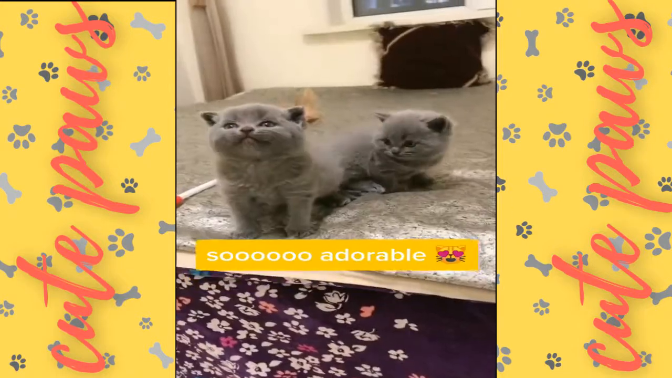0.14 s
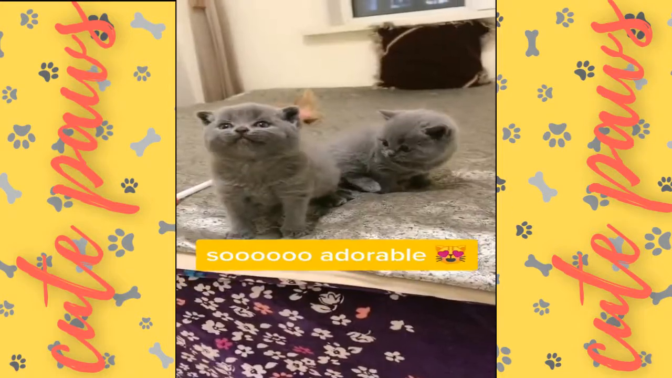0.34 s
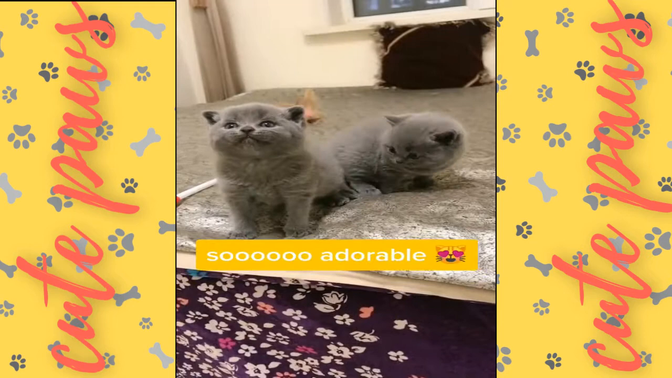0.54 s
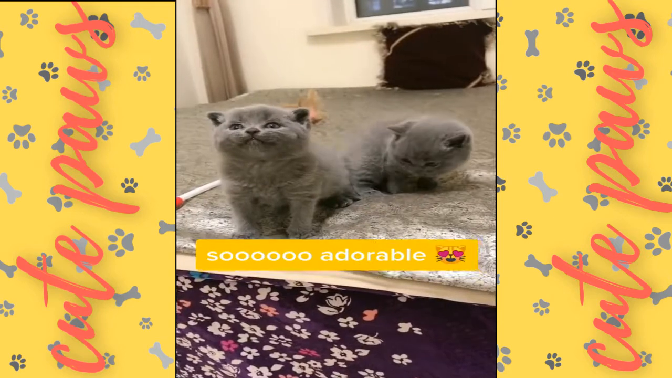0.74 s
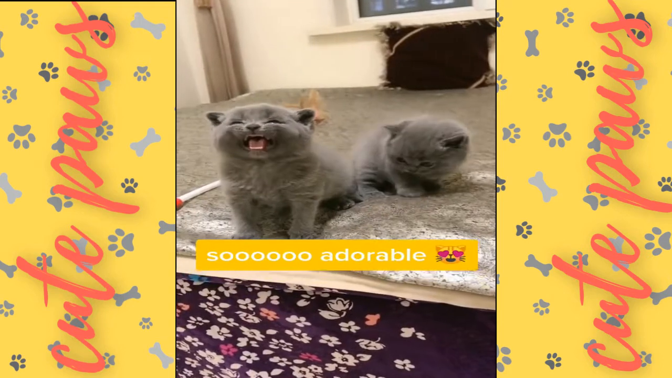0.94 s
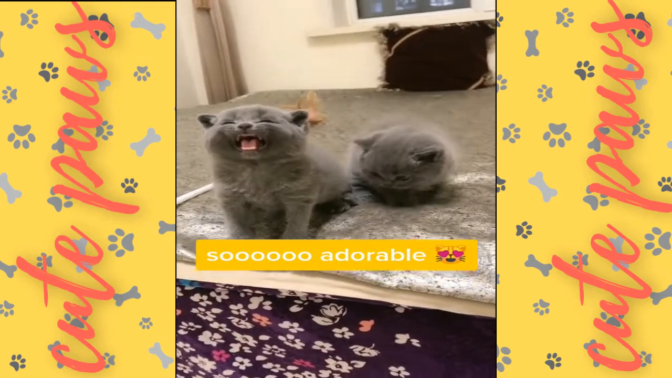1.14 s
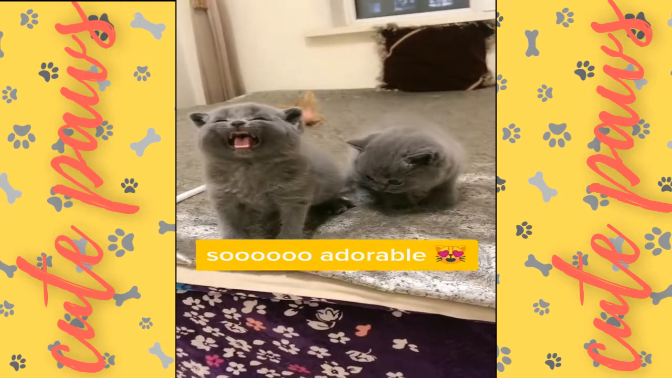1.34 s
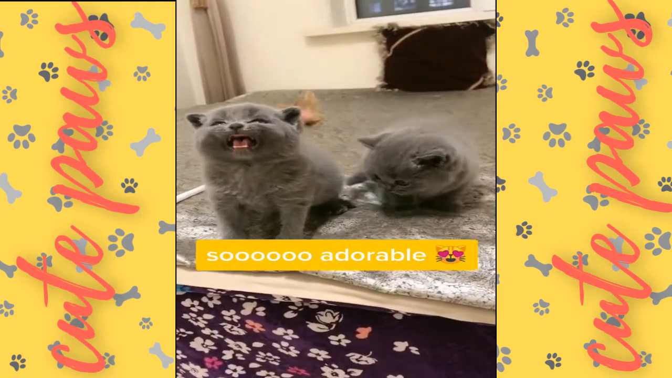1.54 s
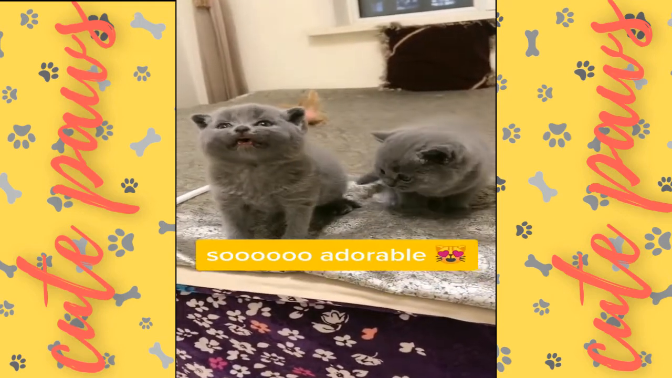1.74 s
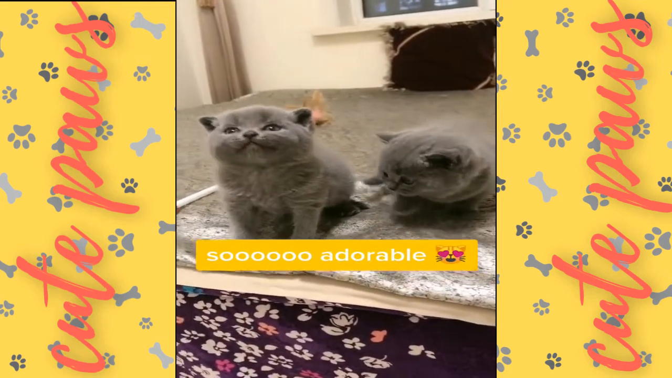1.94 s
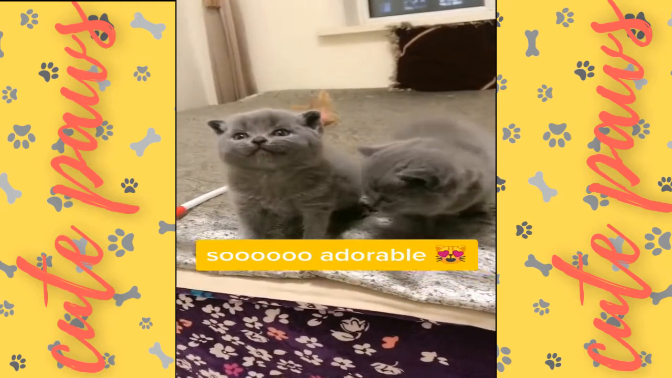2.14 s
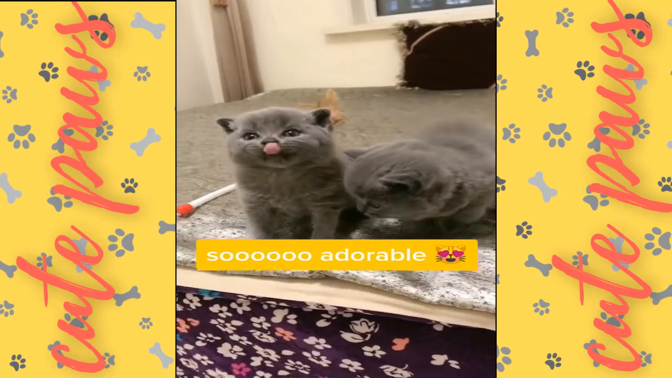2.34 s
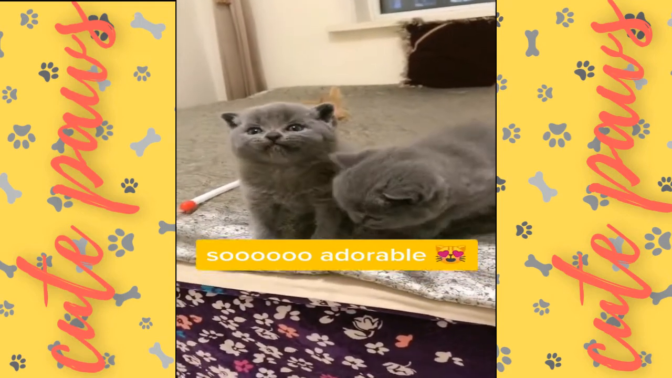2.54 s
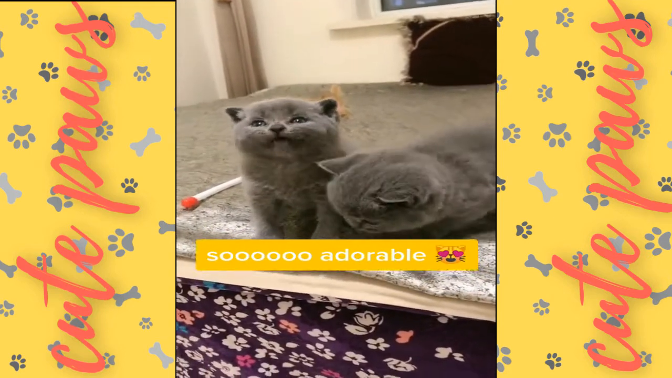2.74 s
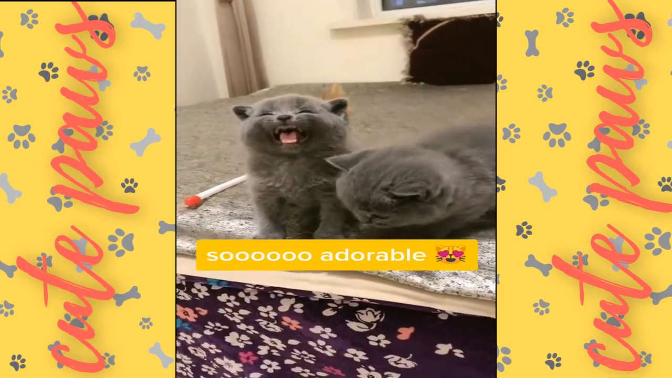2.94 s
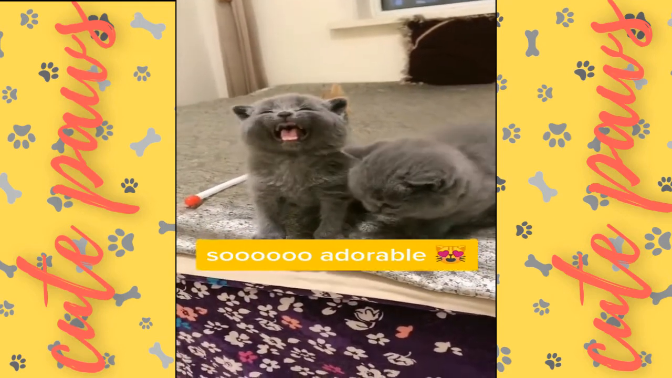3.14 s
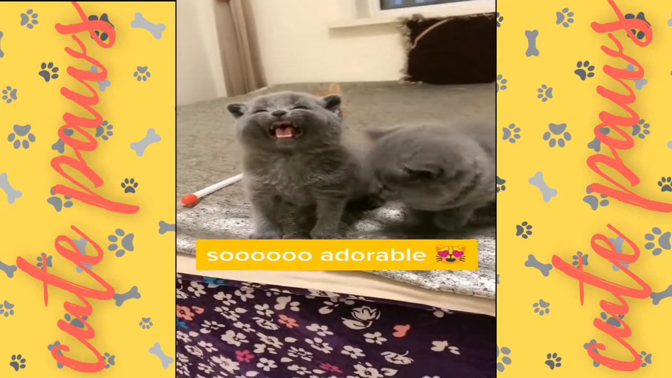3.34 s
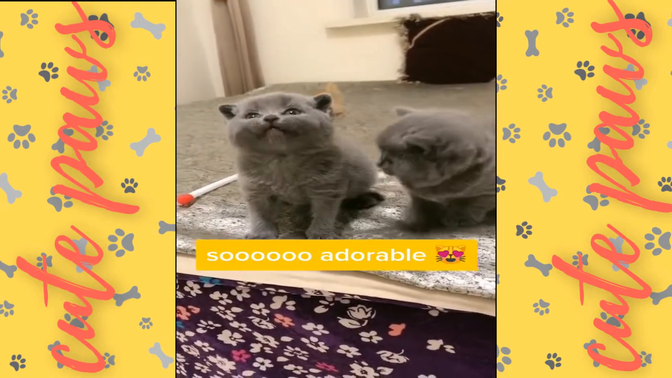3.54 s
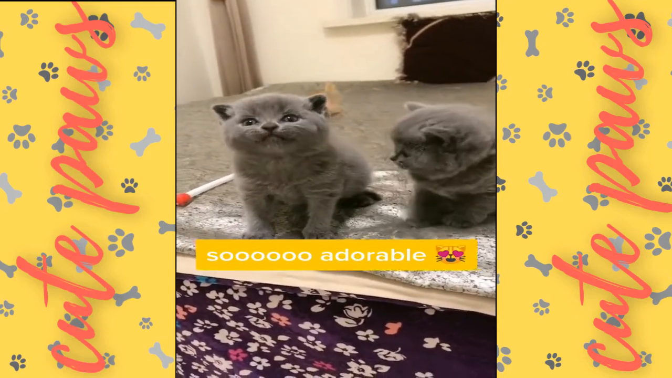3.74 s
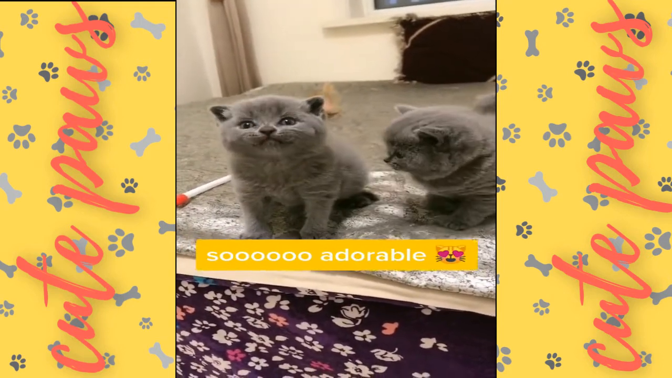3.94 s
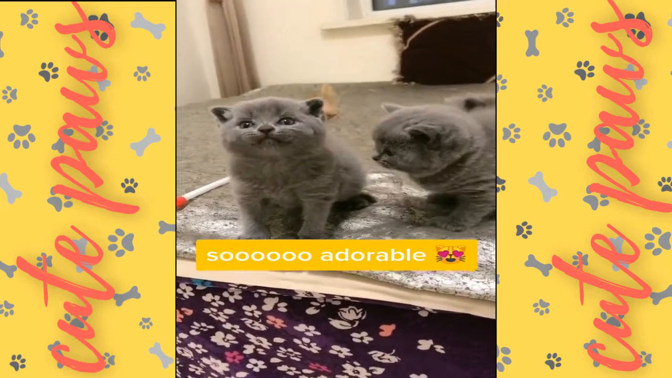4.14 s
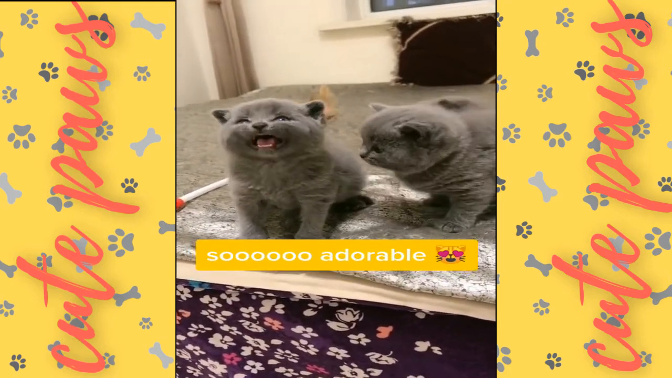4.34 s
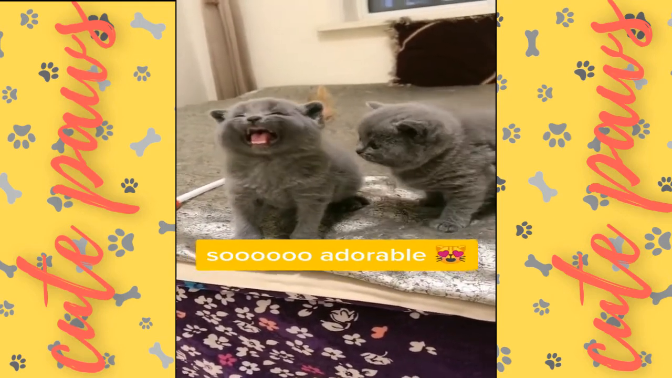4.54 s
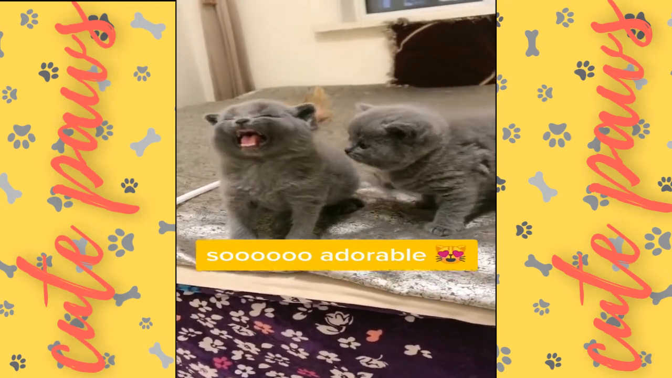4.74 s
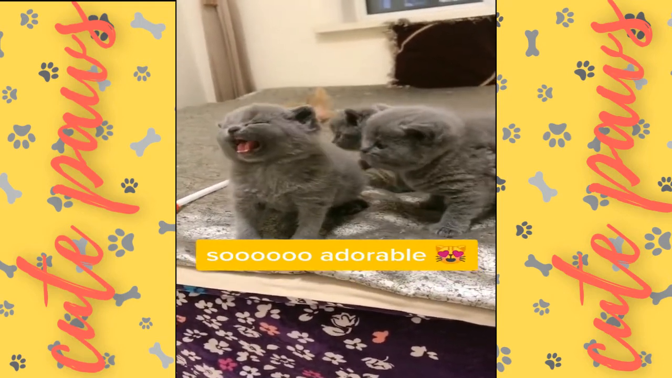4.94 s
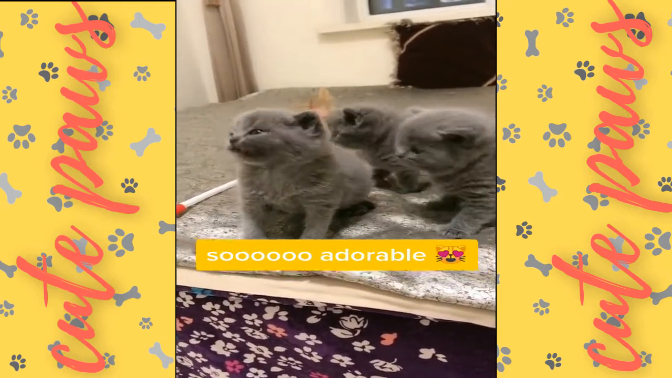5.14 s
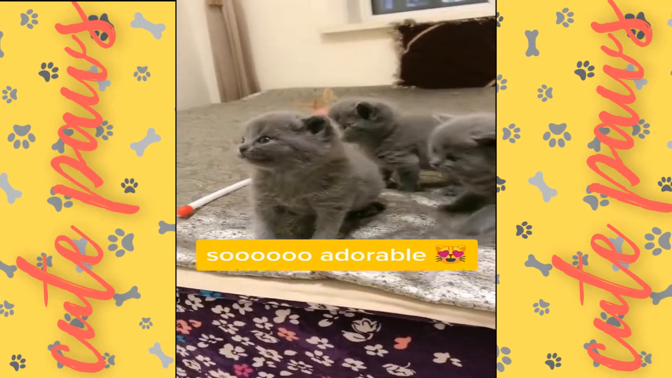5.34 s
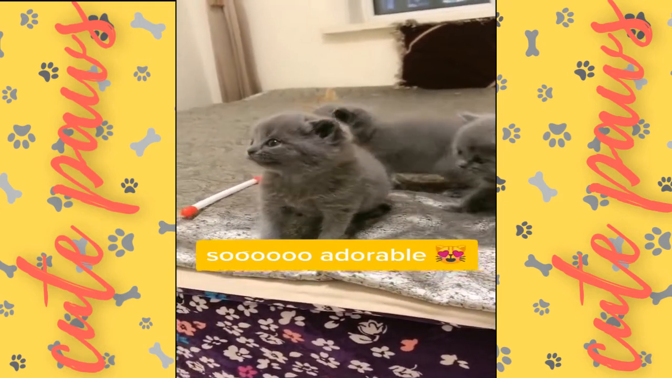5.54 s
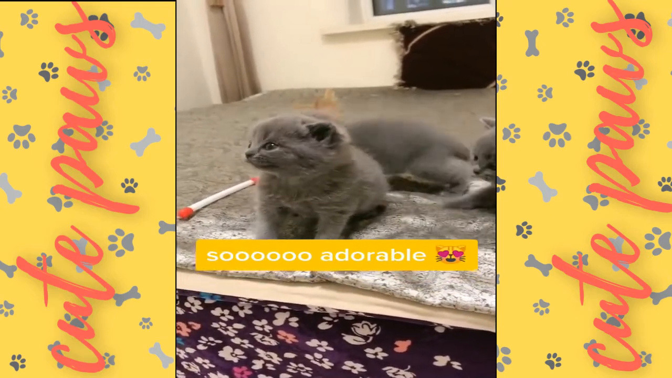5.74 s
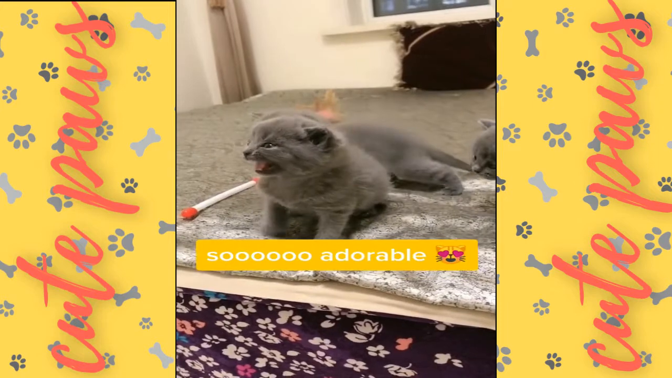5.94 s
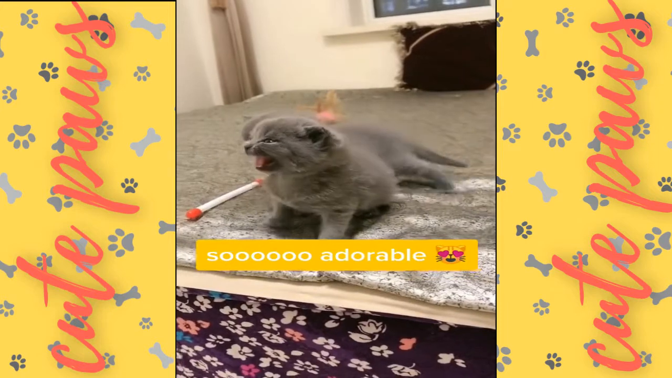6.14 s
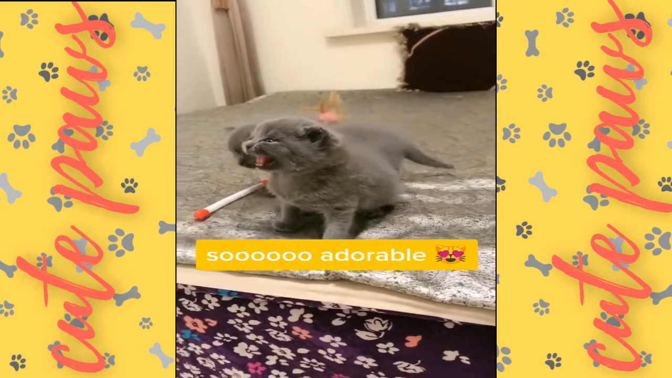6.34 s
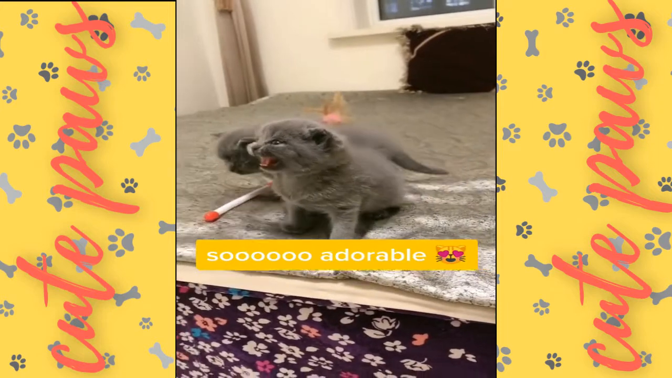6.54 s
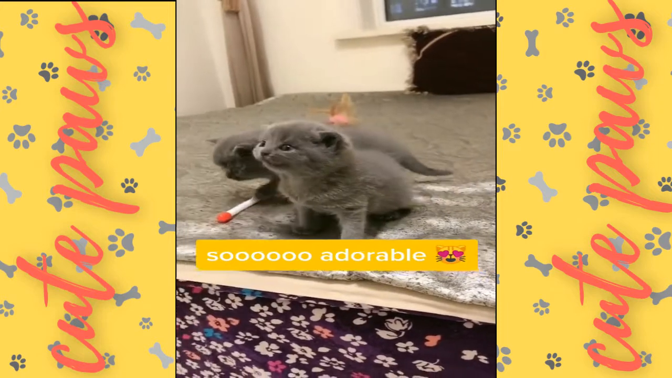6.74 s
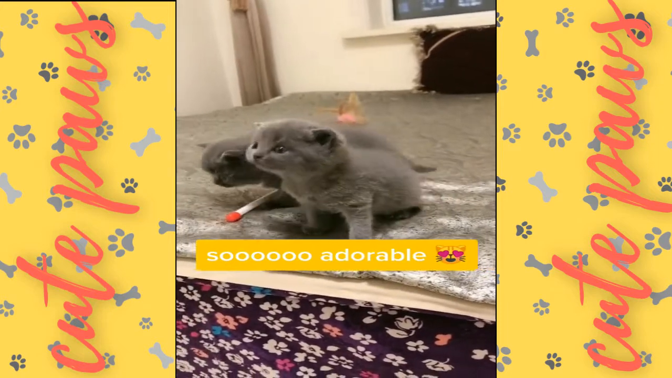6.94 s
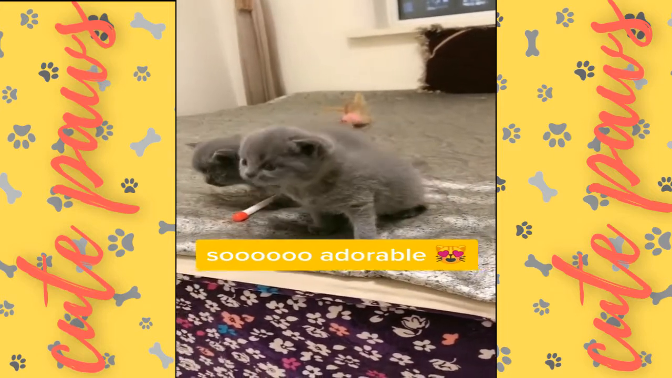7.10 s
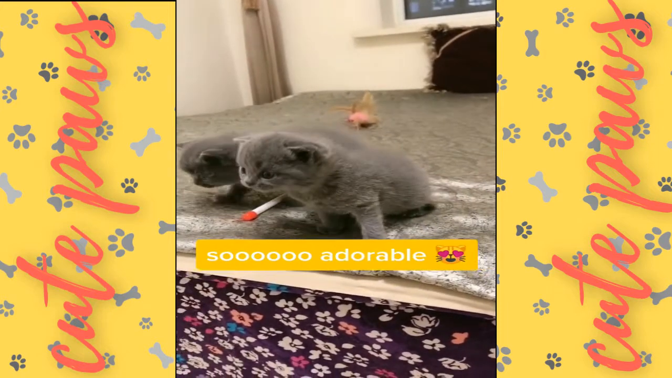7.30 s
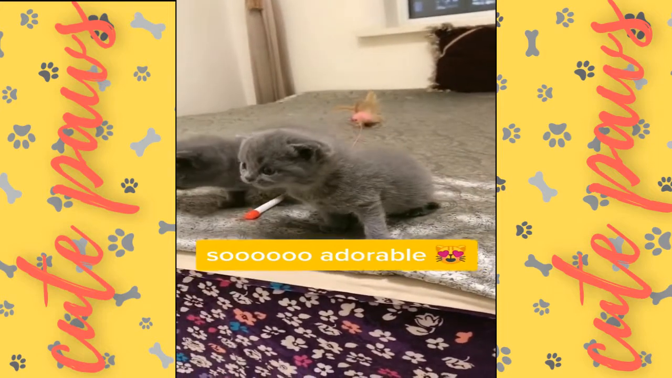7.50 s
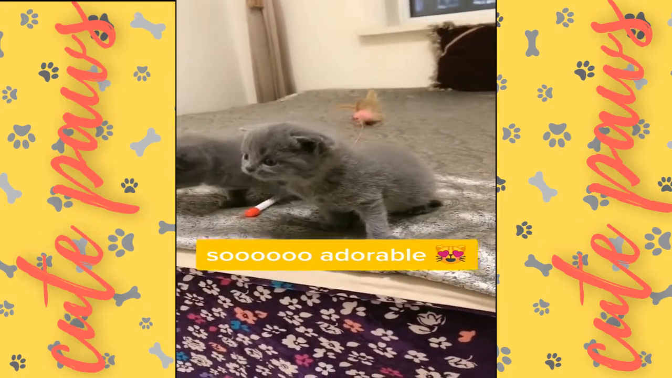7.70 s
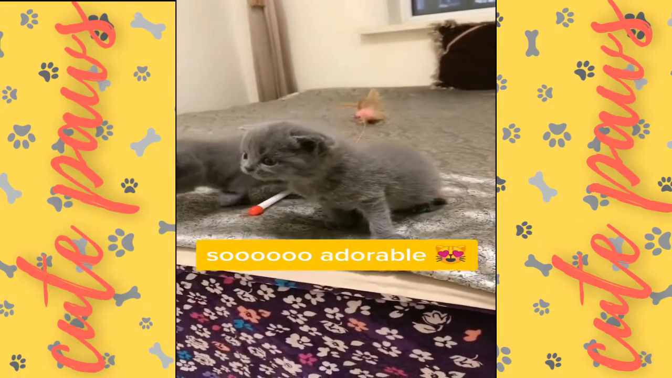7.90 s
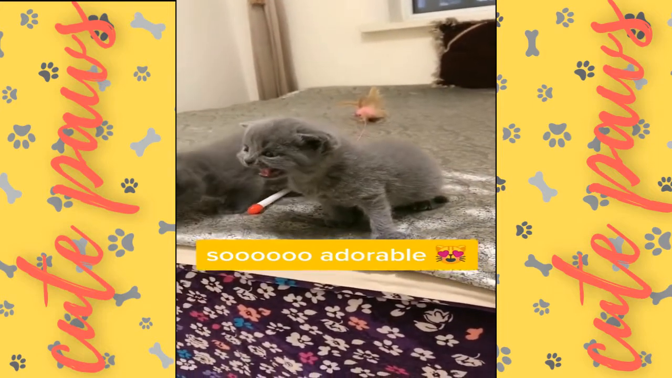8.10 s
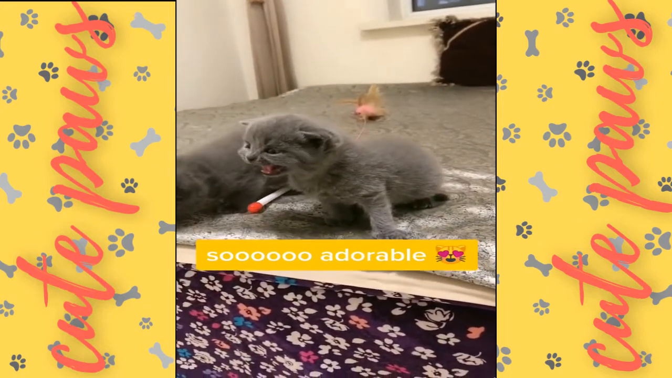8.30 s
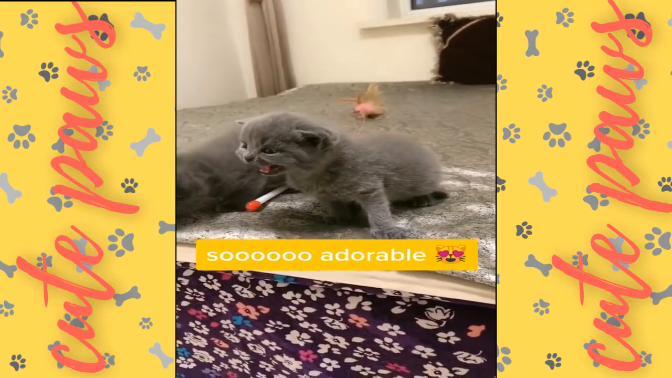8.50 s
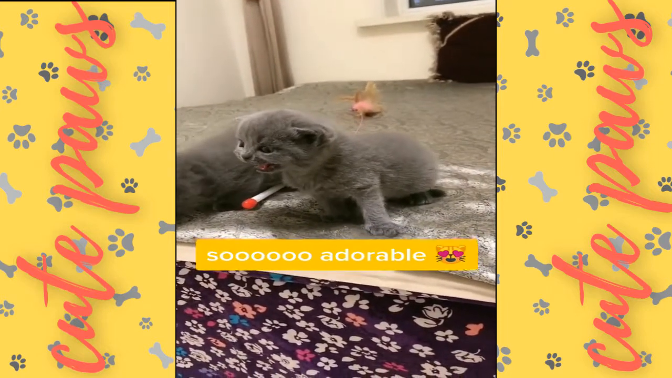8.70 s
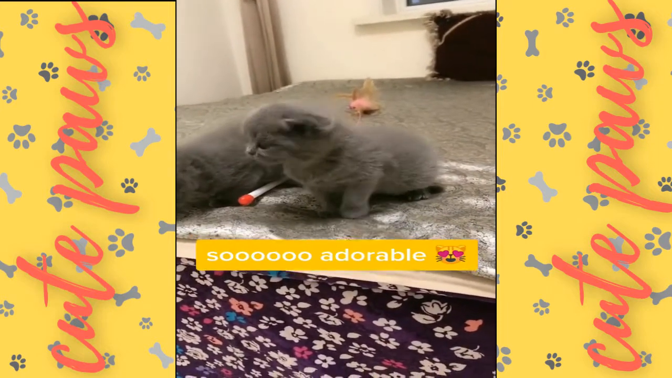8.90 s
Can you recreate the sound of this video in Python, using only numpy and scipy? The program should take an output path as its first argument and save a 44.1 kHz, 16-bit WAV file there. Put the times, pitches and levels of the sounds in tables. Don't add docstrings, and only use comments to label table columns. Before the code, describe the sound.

A tiny kitten about a metre from a phone mews five times in a small carpeted room. Each cry jumps up fast to a bright, open-mouthed peak, then glides down and closes. A litter mate answers faintly with thin, flat mews. Small bumps and cloth rustles come between, soft knocks boom through the floor later, and low rumble and light hiss lie beneath.

```python
import sys
import numpy as np
from scipy import signal
from scipy.fft import rfft, irfft, next_fast_len
from scipy.io import wavfile
from scipy.ndimage import uniform_filter1d, minimum_filter1d

SR = 44100
rng = np.random.default_rng(int(sys.argv[2]) if len(sys.argv) > 2 else 0)


def transcribe(signal):
    frames = np.atleast_2d(signal).T
    limited = np.clip(frames, -1, 1)
    pcm = np.round(limited * 32767).astype(np.int16)
    wavfile.write(sys.argv[1], SR, pcm)


def rack_gain(trim_db):
    fader = np.asarray(trim_db, float)
    return 10 ** (fader / 20)


N = 399571
TIME = np.arange(N) / SR


def unit(x):
    return x / np.sqrt(np.mean(x ** 2))


def band(x, hz, width_hz):
    return signal.lfilter(*signal.iirpeak(hz, hz / width_hz, fs=SR), x)


def sharp_filter(x, order, hz, kind="low"):
    return signal.sosfilt(signal.butter(order, hz, kind, fs=SR, output="sos"), x)


def resonance(hz, centre_hz, width_hz):
    return 1 / np.sqrt(1 + ((hz ** 2 - centre_hz ** 2) / (hz * width_hz)) ** 2)


def walk(rate_hz, size):
    hold = max(int(SR / rate_hz), 1)
    steps = np.repeat(rng.standard_normal(size // hold + 1), hold)
    return unit(uniform_filter1d(uniform_filter1d(steps, hold), hold)[:size])


def curves(table, smooth_s):
    s, *columns = np.transpose(table)
    span = slice(int(s[0] * SR), int(s[-1] * SR))
    smooth = int(smooth_s * SR)
    return span, [uniform_filter1d(np.interp(TIME[span], s, c), smooth, mode="nearest") for c in columns]


def partials(hz, gains, wobble, shimmer_db=1.98):
    phase = 2 * np.pi * np.cumsum(hz * (1 + wobble * walk(110, len(hz)))) / SR
    order = np.arange(1, len(gains) + 1)[:, None]
    voice = np.sqrt(2) * np.sum(gains * np.sin(order * phase), axis=0)
    return voice * rack_gain(shimmer_db * walk(34.3, len(hz)))


def swelling(table):
    power = 0
    for s, db, rise, fall in table:
        power = power + rack_gain(db - np.where(TIME < s, rise, fall) * np.abs(TIME - s)) ** 2
    return np.sqrt(power)


def hiss():
    # frequency in Hz, density in dB per Hz.
    hiss_colour = [(41, -40.5), (70, -5.5), (129, -6), (459, -18), (1030, -19), (2750, -23.5),
                   (4080, -24.5), (4860, -28), (8770, -27.5), (13000, -36.5)]
    hz, db = np.transpose(hiss_colour)
    size = next_fast_len(N)
    colour = rack_gain(np.interp(np.log(np.fft.rfftfreq(size, 1 / SR) + 1), np.log(hz), db))
    noise = irfft(rfft(rng.standard_normal(size)) * colour, size)[:N]
    return unit(noise) * rack_gain(-53 + 0.9 * walk(3.19, N))


def rumble():
    # peak in seconds, peak level in dB, rise and fall in dB per second.
    swells = [(.15, -49, 20, 58), (.5, -50.5, 38, 9), (3.88, -45.5, 11, 59), (4.75, -44, 61, 37),
              (5.57, -44.5, 25, 45), (6.03, -43, 22, 71), (6.76, -36.5, 25, 63)]
    # peak in seconds, peak level in dB, rise and fall in dB per second.
    bumps = [
        (.93, -22.5, 700, 70.3),
        (1.1, -38.5, 300, 30),
        (4.44, -32, 301, 91),
    ]
    gain = np.hypot(rack_gain(-49.5 + 2.5 * walk(3, N)), swelling(swells))
    low = sharp_filter(band(rng.standard_normal(N), 41.2, 24), 3, [24, 110], "band")
    bump = sharp_filter(band(rng.standard_normal(N), 62, 50), 5, 120)
    return unit(low) * gain + unit(bump) * swelling(bumps)


def knocks():
    # frequency in Hz, width in Hz, level in dB.
    floor_modes = [(42, 81, -3), (80, 10, 8), (149.3, 51, 4), (283, 96, 0)]
    # start in seconds, fade T60 in seconds, rattle in dB, boom in dB.
    far_knocks = [
        (6.376, 0.82, -39.5, -44),
        (6.889, 0.94, -31.5, -38),
        (7.293, 0.72, -39, -47.5),
        (7.598, 0.68, -38, -40.5),
    ]
    # start in seconds, fade T60 in seconds, rattle in dB, boom in dB.
    thuds = [(1.21, 0.072, -70, -25), (1.37, 0.18, -68, -40), (1.88, 0.14, -39.5, -60),
             (2.671, 0.19, -43.5, -63), (2.788, 0.36, -44.5, -35.5), (3.541, 0.35, -57, -39.5),
             (4.869, 0.17, -47, -36), (8.71, 0.1, -57, -30), (8.819, 0.11, -38, -60)]
    # start in seconds, fade T60 in seconds, rattle in dB, centre in
    # Hz.
    soft_noises = [
        (-.03, 0.45, -32, 2270),
        (1.865, 0.36, -48, 2163),
        (2.15, 0.26, -53, 3990),
        (8.938, 1, -41.5, 3770),
    ]
    modes = []
    for hz, width_hz, db in floor_modes:
        mode = band(band(rng.standard_normal(N), hz, width_hz), hz, 2 * width_hz)
        modes.append(rack_gain(db) * unit(mode))
    # rattle centre in Hz, level of the two upper modes in dB
    blows = [(*row, 1190, 5) for row in far_knocks] + [(*row, 460, -1.5) for row in thuds]
    blows += [(s, t60_s, db, -65.5, hz, 0) for s, t60_s, db, hz in soft_noises]
    out = np.zeros(N)
    for s, t60_s, rattle_db, boom_db, hz, upper_db in blows:
        span = slice(max(int(s * SR), 0), min(int((s + .9) * SR), N))
        t = TIME[span] - s + 1 / SR
        noise = rng.standard_normal(2 * SR)[:len(t)]
        dull = unit(band(noise, hz, 0.9 * hz)) * rack_gain(-60 * t / t60_s)
        bright = unit(band(noise, min(1.4 * hz, 9000), 4.5 * hz)) * rack_gain(-18 - 60 * t / (0.46 * t60_s))
        boom = modes[0][span] + modes[1][span] + rack_gain(upper_db) * (modes[2][span] + modes[3][span])
        out[span] += rack_gain(rattle_db) * (dull + bright) * np.minimum(t / 0.028, 1) ** 0.55
        out[span] += rack_gain(boom_db - 60 * t / (1.104 * t60_s)) * boom * np.minimum(t / 0.085, 1)
    return out


def litter_mate():
    # time in seconds, pitch in Hz, level in dB, mouth resonance in Hz.
    faint_mews = [
        [(0, 798, -36, 1600), (.035, 749, -42, 1610), (.07, 660, -47, 2400), (.12, 600, -64, 2600)],
        [(4.02, 865, -70, 1500), (4.07, 868, -44, 1560), (4.14, 836, -49.5, 1650), (4.26, 780, -46, 1600)],
        [(5.58, 755, -49, 3720), (5.63, 767, -48, 3700), (5.74, 740, -48, 3440), (5.82, 723, -49, 1360),
         (6.0, 708, -48, 1180), (6.2, 700, -49, 1210), (6.3, 690, -75, 1200)],
    ]
    tilt_db, leak_db, first_db = -2, -24, -11
    order = np.arange(1, 8)[:, None]
    out = np.zeros(N)
    for mew in faint_mews:
        span, (hz, db, mouth_hz) = curves(mew, .025)
        mouth = resonance(hz * order, mouth_hz, .2 * mouth_hz) ** 1.2
        gains = rack_gain(tilt_db * np.log2(order)) * (mouth + rack_gain(leak_db))
        gains[0] = np.maximum(gains[0], rack_gain(first_db))
        out[span] += partials(hz, gains, wobble=0.005, shimmer_db=4.5) * rack_gain(db)
    return out


def kitten():
    # time in seconds, pitch in Hz.
    mew_pitches = [
        [(0.72, 503), (0.788, 880), (0.835, 1040), (0.904, 1138), (1.06, 1171), (1.17, 1141), (1.3, 1057),
         (1.604, 894.3), (1.885, 677.6)],
        [(2.68, 498.5), (2.782, 912), (2.85, 1044), (2.964, 1143), (3.152, 1106), (3.296, 994.5), (3.38, 934),
         (3.524, 715), (3.62, 486)],
        [(4.2, 527), (4.258, 648), (4.31, 896), (4.386, 1076), (4.506, 1186), (4.64, 1177), (4.962, 1023),
         (5.074, 906), (5.19, 530)],
        [(5.78, 534), (5.898, 989), (6.01, 1165), (6.138, 1238), (6.322, 1169), (6.548, 1005), (6.612, 935),
         (6.71, 641), (6.78, 546)],
        [(7.87, 489), (8.002, 1018), (8.07, 1140), (8.14, 1175), (8.234, 1189), (8.52, 1064), (8.64, 962),
         (8.732, 834), (8.87, 460)],
    ]
    # time in seconds, level in dB, mouth resonance in Hz.
    mew_efforts = [
        [(0.72, -83, 4300), (0.754, -35.5, 4470), (0.9, -15, 4430), (1.06, -18.5, 3720), (1.338, -23, 3640),
         (1.48, -29, 3020), (1.798, -38.5, 2330), (1.895, -35, 2800)],
        [(2.68, -68.5, 4000), (2.768, -32, 4340), (2.946, -11, 4710), (3.036, -16.5, 4230), (3.15, -21.5, 3880),
         (3.27, -21.5, 3440), (3.532, -39, 2690), (3.62, -62, 3025)],
        [(4.2, -71, 3970), (4.26, -40, 4130), (4.412, -14.5, 4400), (4.668, -18, 4180), (4.75, -15.5, 3960),
         (4.936, -18, 3926), (5.05, -30.5, 3150), (5.19, -46, 2970)],
        [(5.78, -50.5, 3650), (5.864, -33, 3960), (5.934, -20.5, 4000), (6.022, -16, 4340), (6.1, -16, 4000),
         (6.504, -19.5, 3370), (6.628, -34.5, 2640), (6.77, -46.5, 2340)],
        [(7.87, -59, 3160), (7.962, -24.5, 3820), (8.09, -11, 3600), (8.19, -19.5, 3780), (8.42, -17, 2920),
         (8.614, -17.5, 2900), (8.802, -35, 2355), (8.86, -53.5, 2644)],
    ]
    # steepness above the mouth resonance (exponent),
    # throat ring in dB, first partial in dB, second partial in dB.
    heads = [(2.02, -17, -19, -12.5), (2.86, -15, -20.5, -11.5), (2.12, -15, -19.5, -10.5),
             (1.6, -22, -21, -13), (2.78, -22.5, -20.5, -14.5)]
    full_effort_db = -18
    out = np.zeros(N)
    for pitch, mew, (shading, ring_db, first_db, second_db) in zip(mew_pitches, mew_efforts, heads):
        span, (db, mouth_hz) = curves(mew, 0.044)
        pitch_hz = np.interp(TIME[span], *np.transpose(pitch))
        hz = uniform_filter1d(pitch_hz, int(0.055 * SR), mode="nearest")
        glide = np.gradient(np.log(hz)) * SR
        climb = np.clip(glide, -2, 4)
        weak_db = np.clip(full_effort_db - db, -12, 22)
        to_end_s = TIME[span] - TIME[span][-1]

        lines = hz * np.arange(1, 17)[:, None]
        mouth = resonance(lines, mouth_hz, 986) ** np.where(lines > mouth_hz, shading, 1.3)
        ring = resonance(lines, 6770, 2000)
        ring_db = ring_db + 0.82 * weak_db + 2 * climb
        gains = mouth / np.linalg.norm(mouth, axis=0) + rack_gain(ring_db) * ring / np.linalg.norm(ring, axis=0)
        gains[0] = rack_gain(first_db + 0.5554 * np.clip(full_effort_db - db, -12, 36))
        closing_db = 4.5 * (4.5 - mouth_hz / 1000) - 38 * np.exp(to_end_s / 0.065)
        gains[1] = rack_gain(second_db + 0.7065 * weak_db + closing_db)

        weak_rasp = np.where(glide > 0, .025, .01) * np.clip((-30 - db) / 9, 0, 1)
        slide_rasp = np.where(glide > 0, .004, .002) * np.clip(np.abs(glide) - .8, 0, 8)
        rasp = .002 + weak_rasp + slide_rasp + .03 * np.exp(to_end_s / .03)

        breath_db = -37 + 1.1061 * np.minimum(-14 - db, 24) + 1.8 * climb + 2 * walk(60, len(hz))
        breath = unit(band(rng.standard_normal(len(hz)), 4300, 3300)) * rack_gain(breath_db)
        voice = partials(hz, gains, wobble=rasp) + breath
        out[span] += voice * rack_gain(db) * signal.windows.tukey(len(hz), .03)
    return out


def room(x):
    t60_s, treble_t60_s, tail_db = 0.2, 0.36, -1
    t = TIME[:int(.5 * SR)]
    noise = rng.standard_normal(len(t))
    low = signal.lfilter(*signal.butter(1, 3000, fs=SR), noise)
    tail = low * rack_gain(-60 * t / t60_s) + (noise - low) * rack_gain(-60 * t / treble_t60_s)
    tail = tail - .5 * signal.lfilter(*signal.butter(2, 1500, fs=SR), tail)
    tail = tail * np.clip((t - .004) / 0.0014, 0, 1)
    return x + rack_gain(tail_db) * signal.fftconvolve(x, tail / np.linalg.norm(tail))[:N]


def shifted_top(x, top_hz):
    # start in seconds, end in seconds, frequency in Hz, level in dB.
    whistles = [
        (.88, 1.5, 11886, -52),
        (2.93, 3.2, 9130, -42),
        (.86, .98, 9130, -48),
    ]
    from_hz, shift_hz = 8790, 4134
    size = next_fast_len(N)
    edge, shift, top = (int(hz * size / SR) for hz in (from_hz, shift_hz, top_hz))
    spectrum = rfft(x, size)
    copy = np.zeros_like(spectrum)
    copy_gain = rack_gain(-8 - np.linspace(0, 9.0, top - edge)) * signal.windows.tukey(top - edge, .04)
    copy[edge:top] = spectrum[edge - shift:top - shift] * copy_gain
    copy = irfft(copy, size)[:N]
    loudness = np.abs(uniform_filter1d(np.abs(copy), int(.03 * SR)))
    copy = copy * (loudness / rack_gain(-54.5) + 0.065) ** -0.1
    spectrum = spectrum * np.clip((edge - np.arange(len(spectrum))) / (.03 * edge), 0, 1) ** 2
    padding = unit(sharp_filter(rng.standard_normal(N), 6, [from_hz, top_hz], "band"))
    padding = padding * np.abs(uniform_filter1d(np.abs(copy), int(.02 * SR))) ** 1.034
    out = irfft(spectrum, size)[:N] + copy + rack_gain(-13) * padding
    for start, end, hz, db in whistles:
        fade = np.interp(TIME, [start, start + 0.021, end - .04, end], [0, 1, 1, 0])
        out = out + rack_gain(db) * np.sqrt(2) * np.sin(2 * np.pi * hz * TIME) * fade
    return out


def frames(x):
    return signal.stft(x, SR, nperseg=2048, noverlap=1536)[2][:1024]


def by_band(x, size, how):
    return np.repeat(how(x.reshape(-1, size, x.shape[1]), axis=1), size, axis=0)


def patchwork(draws, bins, hops, count):
    return np.kron(draws, np.ones((bins, hops)))[:, :count]


def masked_bands(x):
    band_bins, mask_reach_hz, flat_db = 32, 1100, -5.2
    z = frames(x)
    count = z.shape[1]
    hz = by_band(np.arange(1024)[:, None] * SR / 2048, band_bins, np.min)
    power = np.abs(z) ** 2 + 1e-18
    loudest = -minimum_filter1d(-power, int(2 * mask_reach_hz * 2048 / SR), axis=0)
    mask_db = -40 + np.where((hz < 2300) | (hz > 3400) & (hz < 4700), -7, 4)
    mask = rack_gain(np.where(hz > 8500, -21, mask_db)) ** 2
    kept = (by_band(power, 8, np.max) > loudest * mask) | (hz < 1000)
    kept &= (hz < 8200) | (by_band(power, 16, np.max) > power.max(axis=0) * rack_gain(-50) ** 2)
    patches = rack_gain(3 * patchwork(rng.standard_normal((32, count // 3 + 1)), 32, 3, count))
    z = z * np.where(hz > 8500, patches, 1)
    wide_db = 10 * np.log10(uniform_filter1d(power, 2 * band_bins, axis=0) + 1e-18)
    mean_db = uniform_filter1d(10 * np.log10(power), 2 * band_bins, axis=0)
    flat = by_band(mean_db - wide_db, band_bins, np.mean) > flat_db
    luck = patchwork(rng.random((64, count // 5 + 1)), 16, 5, count)
    share = np.where((hz < 8000) & (hz > 4700), .65, np.where(hz > 8000, .7, .35))
    swap = flat & (hz > 4100) & (luck < share)
    ears = []
    for _ in range(2):
        noise = frames(rng.standard_normal(N))
        noise = noise * np.sqrt(by_band(power, band_bins // 2, np.mean) / np.mean(np.abs(noise) ** 2))
        mixed = np.where(swap, noise, z * kept)
        mixed = np.vstack([mixed, 0 * mixed[:1]])
        ears.append(signal.istft(mixed, SR, nperseg=2048, noverlap=1536)[1][:N])
    return np.array(ears)


def scene():
    mono = room(kitten() + litter_mate()) * rack_gain(-5.5) + knocks() + rumble()
    return np.array([mono, mono])


def roll_off(x):
    return signal.sosfilt(signal.butter(12, 13870, fs=SR, output="sos"), x)


def record(dry):
    top_hz = 13150
    low_pass = signal.ellip(8, .2, 70, top_hz, fs=SR, output="sos")
    heard = signal.sosfilt(low_pass, shifted_top(dry[0], top_hz) + hiss())
    mix = masked_bands(heard)
    return roll_off(mix)


dry = scene()
out = record(dry)
transcribe(out)
```